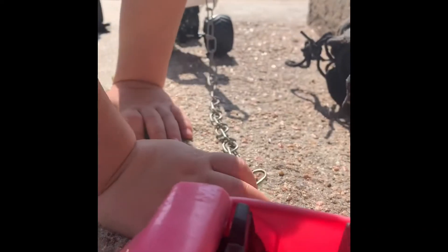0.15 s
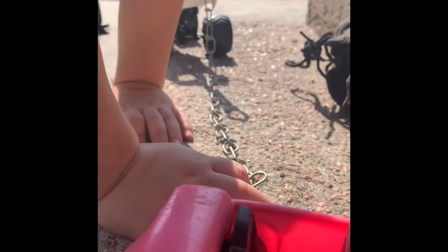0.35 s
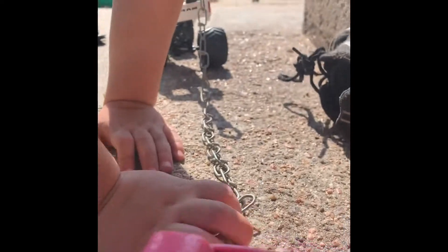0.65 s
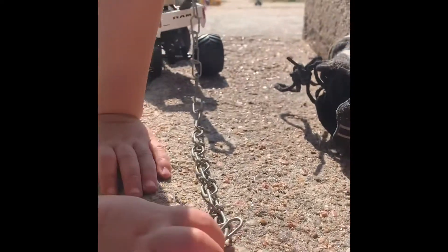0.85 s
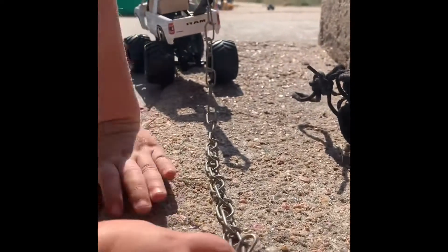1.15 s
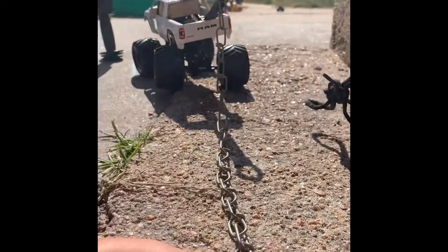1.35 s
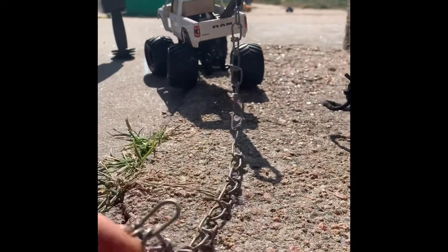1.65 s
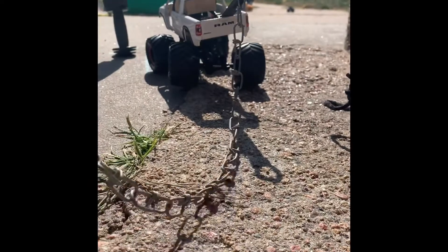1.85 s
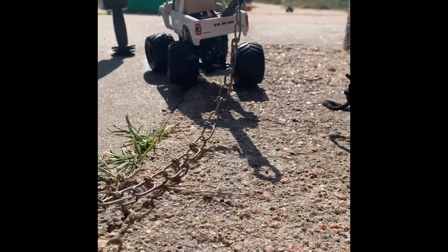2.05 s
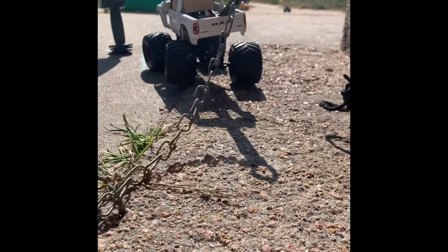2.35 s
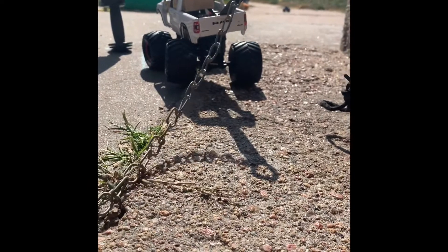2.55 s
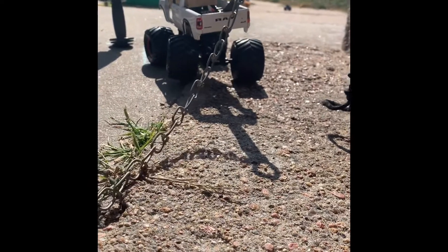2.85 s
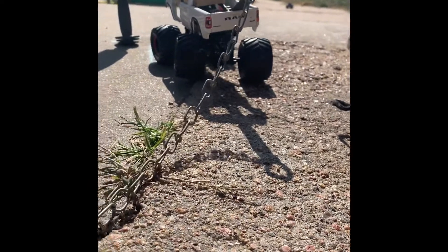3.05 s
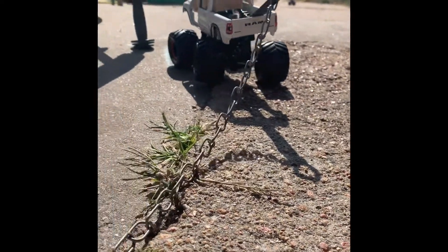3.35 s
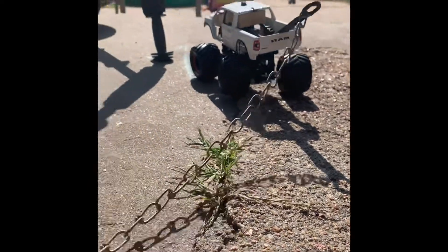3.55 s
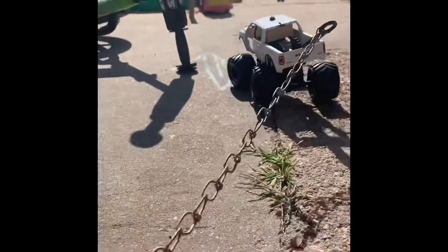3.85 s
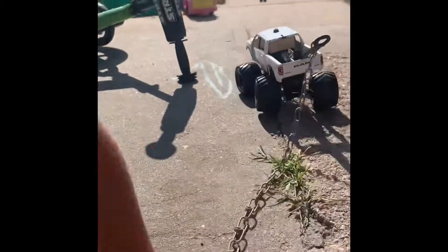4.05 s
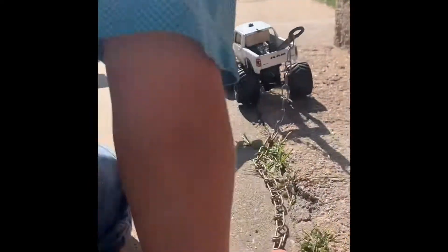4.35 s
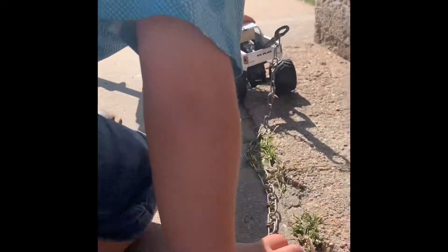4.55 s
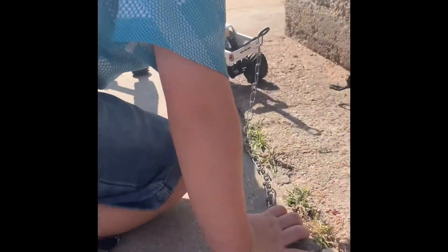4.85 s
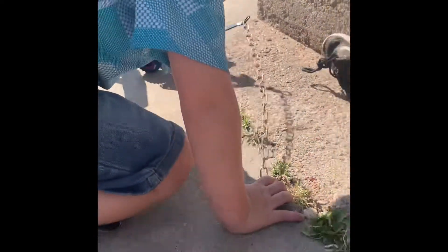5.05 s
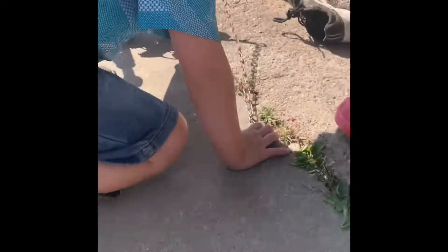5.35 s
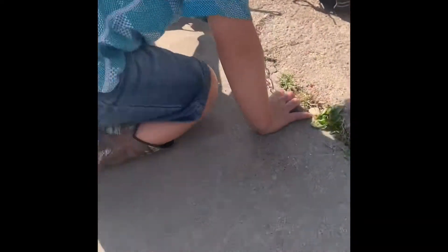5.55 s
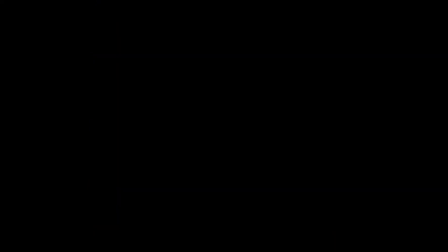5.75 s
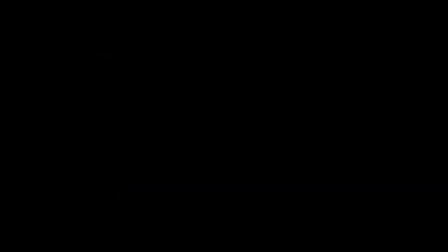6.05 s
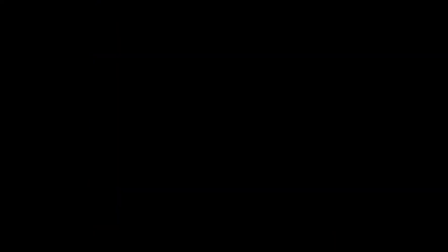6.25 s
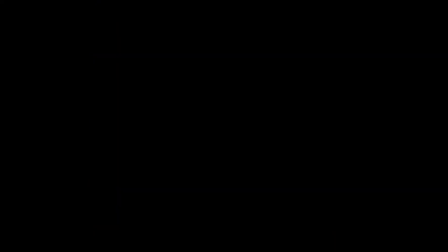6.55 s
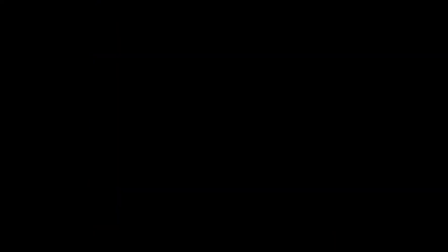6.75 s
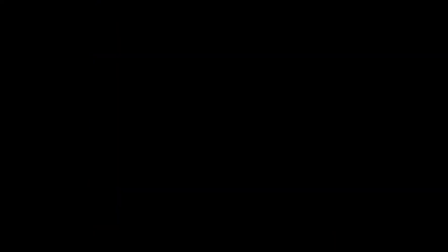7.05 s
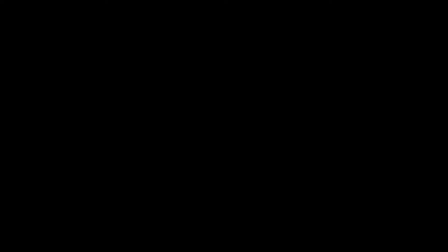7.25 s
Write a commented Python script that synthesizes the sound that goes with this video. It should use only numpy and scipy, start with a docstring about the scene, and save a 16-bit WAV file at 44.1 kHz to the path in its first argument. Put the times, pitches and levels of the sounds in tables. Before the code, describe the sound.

A plastic toy truck is tugged across rough concrete by a metal chain. Several short jerks make hollow rattles and soft tyre thuds, then the links ring briefly. Three longer pulls follow, with fast, buzzing clatter from knobbly tyres, knocks on small stones and thin chain skittering. A raspy axle squeak rises in the last pull. It is heard close, outdoors, over a low hum and a few very faint bird whistles.

```python
"""A plastic toy truck with knobbly hollow tyres is dragged over rough concrete in short and long pulls.
Each tread lug strikes the ground and drives the resonances of chassis, shell and tyres; stones jolt the
body, which rocks on its tyres, and an axle strains in the last pull. A chain skitters, snaps and rings
behind; a far bird whistles over outdoor hum. The mono sound is coloured and widened to stereo."""
import sys
import numpy as np
from scipy import signal
from scipy.fft import rfft, irfft, next_fast_len
from scipy.io import wavfile
from scipy.ndimage import uniform_filter1d

SR = 44100
rng = np.random.default_rng(int(sys.argv[2]) if len(sys.argv) > 2 else 0)


def dump_mix(stems):
    """Bounce the given channels to the path in sys.argv[1] as a 16-bit WAV at rate SR."""
    frames = np.atleast_2d(stems).T  # one column per channel
    limited = np.clip(frames, -1, 1)  # hard clip at full scale
    pcm = np.round(limited * 32767).astype(np.int16)
    wavfile.write(sys.argv[1], SR, pcm)


N = 325927
T = np.arange(N) / SR
FFT_SIZE = next_fast_len(N + SR)
HZ = np.maximum(np.arange(FFT_SIZE // 2 + 1) * SR / FFT_SIZE, 1)

# short pulls: (start [s], length [s], chassis rattle [dB], its change by the end [dB],
# shell ring over rattle [dB], chain skitter over rattle [dB])
SHORT_PULLS = [(0.024, 0.2, -32, -2, 5, -9), (0.432, 0.031, -39.5, 3, -1, -11),
               (0.469, 0.088, -29, -6, 3.5, -10), (0.77, 0.11, -36, 2.5, 4.5, -12.5),
               (1.034, 0.094, -33.5, 0.5, 3.5, -12), (1.318, 0.029, -32, -0.5, 6, -13),
               (1.633, 0.034, -36.5, -10, 6.5, -9), (1.861, 0.061, -35.5, -6.5, 2.5, -8.5),
               (3.665, 0.035, -33, -7, -4.5, -20), (3.973, 0.024, -37, -6, 2, -27),
               (5.312, 0.036, -37, 3, 1, -16.5), (5.427, 0.02, -41.5, 1, 4, -10)]
# long pulls, a list of rows each: (time [s], chassis rattle [dB], shell ring over rattle [dB],
# chain skitter over rattle [dB], sizzle over skitter at the usual rattle [dB])
LONG_PULLS = [
    [(2.08, -39, 5, -10, -5), (2.14, -34, 4, -13.5, -3), (2.36, -37, 3.5, -13.5, 0),
     (2.57, -32.5, 3.5, -5, -0.5), (2.68, -30.5, 0.5, -10, -6), (2.8, -33.5, 2.5, -12, 2.5),
     (2.96, -33, 2.5, -3.5, -3), (3.07, -30.5, 4.5, -9.5, 2), (3.26, -35, 1, -11.5, -1)],
    [(4.0, -34.5, 0, -12.5, -1), (4.14, -35, -0.5, -14, 1), (4.3, -32.5, 4, -8.5, 3),
     (4.45, -31.5, 6, -6, 5), (4.58, -30.5, 0.5, -11, -4), (4.73, -34.5, -0.5, -15.5, 3),
     (4.86, -28, -4.5, -27.5, -2), (4.9, -37, -3, -38, 3)],
    [(5.46, -35, 0.5, -14, -9), (5.52, -33, 9, -15.5, 9), (5.57, -36.5, 3.5, -8.5, -5),
     (5.69, -31, 1, -13, 2), (5.82, -32.5, 1.5, -3.5, -4), (6.05, -33, 5.5, -13.5, 4.5),
     (6.3, -29.5, 2.5, -22, 9.5), (6.6, -31, 1, -34.5, 18), (6.71, -31, 8, -18.5, 9.5),
     (6.85, -36.5, 2, -11.5, 1)],
]
# slack parts stirring between pulls: (time [s], chassis [dB], shell [dB], chain [dB], tyres [dB])
SLACK_LEVELS = [(0, -33.5, -37, -47, -45), (.62, -50.5, -48, -54, -51.5), (.75, -51.5, -46, -51, -54),
                (1.3, -49.5, -47.5, -61, -78), (1.56, -64, -49, -55, -52), (1.9, -62, -51, -71, -61),
                (3.4, -50.5, -45.5, -54, -48), (3.65, -54, -67, -61.5, -64), (3.92, -53, -85, -53.5, -64),
                (5.0, -49, -42.5, -55, -47.5), (5.3, -55, -56, -52, -63), (6.95, -47.5, -44, -56, -48),
                (7.1, -48.5, -53, -56, -47), (7.22, -52.5, -48, -47, -64), (7.39, -46.5, -51, -58, -44)]
# wheel speed once under way: (time [s], speed [rev/s])
WHEEL_SPEED = [(2.3, 14), (2.732, 14.75), (3.13, 15.6), (3.25, 16.2), (4.1, 14.6), (4.384, 14.8),
               (4.9, 16.3), (5.55, 14.8), (5.778, 15.3), (5.988, 15.75), (6.426, 16.5), (6.6, 17.2),
               (6.85, 17.4)]
# spectrum of the background hum and hiss, cut off above 11 kHz: (frequency [Hz], relative level [dB])
BACKGROUND_SPECTRUM = [(25, -25), (55, 5), (95, -3.5), (140, 1), (330, -2), (620, -12.5), (850, -7),
                       (1700, -5), (2200, -2), (2900, -18), (3600, -16), (5500, -26), (8000, -44),
                       (10950, -41), (11400, -62)]
# resonances of the plastic panels: (frequency [Hz], nominal bandwidth [Hz], gain [dB])
CHASSIS_MODES = [(912, 151, 12), (1005, 100, 10), (1204, 134, 13.5), (1399, 98, 11), (1526, 336, 6)]
SHELL_MODES = [(1921, 84, 1), (2162, 130, 8), (2322, 150, 2), (2523, 76, -2)]
# impacts on stones: (time [s], chassis level [dB], shell level [dB])
STONE_BUMPS = [(0.023, -20.5, -24), (0.067, -30, -16), (0.094, -33, -17), (0.164, -20, -49),
               (0.186, -24, -48), (0.206, -24.5, -20.5), (0.232, -17.5, -27), (0.464, -31, -44),
               (0.496, -22, -11), (0.766, -29, -40), (0.788, -22, -47), (0.847, -21, -17.5),
               (0.872, -41, -18), (1.031, -24.5, -29), (1.09, -21, -32), (1.317, -19.5, -25),
               (1.352, -23, -25), (1.633, -29, -33), (1.654, -27, -32), (1.894, -21.5, -36),
               (1.916, -25.5, -30), (2.077, -22.5, -38), (2.1, -39, -25), (2.287, -32, -14),
               (2.415, -26, -43), (2.664, -38, -17), (2.78, -33, -19), (2.868, -28, -12.5),
               (2.903, -30, -17), (3.079, -19, -18), (3.246, -25, -44), (3.682, -25, -38),
               (3.999, -24, -53), (4.065, -18, -17), (4.162, -18.5, -20), (4.187, -61, -20),
               (4.304, -25, -31), (4.364, -22, -18), (4.443, -25, -38), (4.839, -26, -21),
               (5.337, -24, -26), (5.455, -26, -26), (5.486, -27, -24), (5.515, -20, -17),
               (5.592, -18, -41), (5.719, -21.5, -32), (5.989, -20, -14), (6.156, -26, -22),
               (6.384, -23, -19), (6.424, -26, -24), (6.463, -30, -27), (6.724, -30, -20)]
# resonances of a hollow tyre: (frequency [Hz], gain [dB], time to decay by 60 dB [s])
TYRE_MODES = [(147, -13, 0.17), (205, 1, 0.03), (270, -2, 0.03), (333, -2, 0.044), (439, -6, 0.082)]
# spectrum of sliding links: (frequency [Hz], relative level [dB])
CHAIN_SPECTRUM = [(2500, -30), (2950, -3.5), (3900, 3.5), (4600, 2.5), (6000, 3), (7100, -10.5),
                  (8500, -10), (10000, -13), (12300, -29), (12800, -23.5), (13300, -47)]
# a tyre drops: (time [s], level [dB])
TYRE_DROPS = [(0.055, -28), (0.473, -36), (0.797, -34), (1.044, -27), (1.328, -31), (1.656, -36),
              (1.91, -30), (2.085, -31.5), (3.681, -27.5), (4.026, -26), (5.344, -26.5), (5.466, -31)]
# links snap taut: (time [s], level [dB])
LINK_SNAPS = [(.0667, -45), (.0942, -39), (0.232, -38), (0.498, -34), (0.8722, -48), (2.5855, -44),
              (2.87, -34), (2.9801, -43), (3.087, -33), (4.329, -39), (4.4448, -45), (4.4662, -44),
              (5.7193, -46), (5.9906, -49), (6.1679, -41), (6.424, -45)]
# the body rocks after a jerk: (time [s], frequency [Hz], peak level [dB])
BODY_ROCKS = [(.2, 152.7, -36.5), (.56, 147, -37.5), (.89, 137.4, -36), (1.13, 145.6, -40),
              (2.28, 143.6, -33.5), (4.11, 143.5, -37), (5.54, 142.5, -37.5), (6.62, 278, -32.5)]
# bird whistles: (start [s], length [s], first frequency [Hz], last frequency [Hz], relative level [dB])
BIRD_CALLS = [(0.3, 0.13, 11270, 10100, -63), (3.53, 0.11, 10900, 10260, -63),
              (5.17, 0.15, 11200, 10400, -63)]
# lifted links ring: (time [s], peak level [dB])
LINK_RINGS = [(1.732, -33), (1.752, -34), (1.764, -42), (1.792, -31), (1.807, -36), (1.829, -37),
              (1.9629, -39), (2.0023, -36), (2.039, -32.5)]
# the straining axle: (time [s], resonance [Hz], relative level [dB])
AXLE_STRAIN = [(5.9, 2596, -48), (6.151, 2734, -39.5), (6.549, 2871, -34.5), (6.72, 2800, -38),
               (6.821, 3188, -41), (6.858, 3304, -49), (6.88, 3326, -62)]
# narrow peaks and dips that colour the treble: (frequency [Hz], width [Hz], gain [dB])
TREBLE_COLOUR = [(2900, 250, -4), (3350, 170, 7), (3700, 170, 6), (4000, 200, -5), (4280, 150, -7),
                 (4600, 420, 7), (4950, 200, -2), (5300, 280, 8), (5680, 150, -7), (6000, 300, 5),
                 (6550, 150, 4), (7500, 400, 4), (7820, 200, -4), (8100, 300, 6), (8550, 400, -3),
                 (9200, 200, -3), (9520, 400, 5), (10250, 300, -2), (10750, 600, 2)]
# stereo widening of a mono sound: (frequency [Hz], phase lead of right [half turns],
# left minus right [dB], diffuse share [dB])
STEREO_SPREAD = [(25, 0, 0, -30), (120, .1, -1, -25), (1500, .1, 0, -20), (1800, 0, 0, -18),
                 (1950, .16, 2, -14), (2050, 1.34, 0, -18), (2500, 1.7, 6, -16), (2850, 1.65, 7, -8),
                 (2950, 2.3, 0, -8), (3200, 2.64, -4, -7), (3600, 2.16, 0, -10), (3900, 2.07, -4, -6),
                 (4100, 1.02, 5, -8), (4450, 1.03, -4, -14), (4680, 3, 0, -40), (5150, 3, 0, -40),
                 (5350, 2.77, 0, -12), (6000, 2.4, 0, -12), (6600, 2.7, 0, -6), (7050, 2.74, 5, -4),
                 (7500, 1.37, -6, -4), (8200, 1.6, 0, -6), (8700, 1.2, 0, -3), (9150, 1, 0, -45),
                 (10300, 1, 0, -45), (10500, .85, 0, -5), (11500, .15, 0, -5), (11800, 0, 0, -18)]

LUGS_PER_REV, KNOBS_PER_REV = 6, 72  # lugs and small unevennesses round a wheel
USUAL_RATTLE_DB = -32


def undb(db):
    """Amplitude ratio of a level in decibels."""
    return 10 ** (np.asarray(db) / 20)


def unit(x):
    """Normalisation to rms 1."""
    return x / np.sqrt(np.mean(x ** 2))


def through(x, response):
    """Linear filtering: the spectrum is multiplied by a frequency response."""
    return irfft(rfft(x, FFT_SIZE) * response, FFT_SIZE)[..., :N]


def spectrum(points):
    """Spectral envelope through (frequency [Hz], level [dB]) points, on a logarithmic frequency axis."""
    hz, db = np.transpose(points)
    return undb(np.interp(np.log(HZ), np.log(hz), db))


def resonance(hz, width):
    """Response of a damped oscillator, gain 1 at its natural frequency."""
    return 1 / (1 + 1j * (HZ / hz - hz / HZ) * hz / width)


def phase(hz):
    """Phase in radians, the time integral of frequency."""
    return 2 * np.pi * np.cumsum(hz) / SR


def drift(rate_hz):
    """Smoothed Gaussian noise, standard deviation near 1."""
    hold = int(SR / rate_hz)
    steps = np.repeat(rng.standard_normal(N // hold + 1), hold)
    return 1.29 * uniform_filter1d(uniform_filter1d(steps, hold), hold)[:N]


def impulses(times, gains):
    """Impulse train of single-sample pushes."""
    out = np.zeros(N)
    np.add.at(out, np.minimum((np.asarray(times) * SR).astype(int), N - 1), gains)
    return out


def swell(pushes, rise_s, order=2):
    """Convolution spreads each push into a pulse; a higher order makes it more symmetric."""
    t = np.arange(int(6 * rise_s * SR)) / SR / rise_s
    return signal.oaconvolve(pushes, (t * np.exp(1 - t)) ** order)[:N]


def grit():
    """Rough ground is a broadband force: pushes of equal size and random sign."""
    return np.sign(rng.standard_normal(N))


def pulls():
    """Driving levels of each pull in time order, as rows of (time [s], rattle, ring, skitter, sizzle [dB])."""
    short = [[(start, db, *relative_db, -5), (start + length, db + change_db, *relative_db, -5)]
             for start, length, db, change_db, *relative_db in SHORT_PULLS]
    long = [list(map(tuple, rows)) for rows in LONG_PULLS]
    return [np.array(rows) for rows in sorted(short + long)]


def pull_level(level_of, slack_db, delay_s=0, stop_s=0.012, settle_db=-35):
    """Incoherent sources add in power: the level in dB of all pulls over the slack."""
    t, grip_s, settle_s = T[::64], 0.016, 0.18
    power = undb(np.interp(t, np.array(SLACK_LEVELS)[:, 0], slack_db)) ** 2
    for rows in pulls():
        times, *levels = rows.T
        held = undb(np.interp(t, times, level_of(*levels)))
        rise = np.clip((t - times[0] - delay_s) / grip_s + .5, 0, 1)
        after = np.maximum(t - times[-1] - delay_s, 0)
        settling = undb(settle_db) * np.exp(-after / settle_s)  # loose parts rattle on
        fall = np.maximum(np.exp(-after / stop_s), settling)
        power += (rise * fall * held) ** 2
    return np.interp(T, t, 10 * np.log10(power))


def lug_times(start_rev_hz=11, speed_up_s=0.16):
    """Rolling contact: lugs meet the ground at a rate proportional to wheel speed."""
    starts = np.array([rows[0, 0] for rows in pulls()])
    latest_start = starts[np.maximum(np.searchsorted(starts, T) - 1, 0)]
    since = np.maximum(T - latest_start, 0)
    full_speed = np.interp(T, *np.transpose(WHEEL_SPEED))
    speed = full_speed - (full_speed - start_rev_hz) * np.exp(-since / speed_up_s) ** 2
    count = np.cumsum(LUGS_PER_REV * speed * (1 + .004 * drift(25))) / SR
    count -= np.interp(T - since, T, count)  # every pull starts on a lug
    return np.flatnonzero(np.diff(np.floor(count))) / SR


def contact(lugs, spread_db, rise_s, rub, shared_db=0, order=2):
    """Contact force, rms 1: uneven lug impacts over steady friction."""
    sizes = undb(spread_db * rng.standard_normal(len(lugs)) + shared_db)
    return unit(unit(swell(impulses(lugs, sizes), rise_s, order)) + rub)


def outdoors(level_db=-43.5):
    """Distant hum and hiss: noise in three bands, each with its own slow amplitude modulation."""
    bass, treble = 1 / (1 + (HZ / 500) ** 4), 1 / (1 + (3000 / HZ) ** 4)
    background = 0
    for band, waver_db, rate_hz in [(bass, 1.5, 6), (1 - bass - treble, 1.5, 9), (treble, 1.2, 4)]:
        noise = through(rng.standard_normal(N), spectrum(BACKGROUND_SPECTRUM) * band)
        background += noise * undb(waver_db * drift(rate_hz))
    return unit(background) * undb(level_db)


def panels(lugs, shared_db, modes, level_db, bump_db, spread_db, rise_s, click_db):
    """Modal superposition: every resonance takes its own share of each lug, click and stone bump."""
    rolling, response, jolt, power = 0, 0, 0, 0
    bumps = swell(impulses(np.array(STONE_BUMPS)[:, 0], undb(bump_db)), rise_s=0.003, order=5)
    ground = grit()
    lowpass = 1 / (1 + (HZ / 3000) ** 6)  # soft plastic passes no treble
    for hz, width, db in modes:
        mode = undb(db) * resonance(hz, 1.345 * width) ** 2 * lowpass
        clicks = undb(click_db) * unit(impulses(lugs + rise_s, rng.standard_normal(len(lugs))))
        force = contact(lugs, spread_db, rise_s, rub=0.3, shared_db=shared_db, order=5) * ground + clicks
        rolling += through(force * undb(level_db), mode)
        response += mode
        mode_power = undb(db) ** 2 * width
        jolt += np.sqrt(mode_power) * np.sin(phase(hz + width / 2 * drift(200)))
        power += mode_power
    return rolling / np.sqrt(np.mean(np.abs(response) ** 2)) + bumps * jolt / np.sqrt(power)


def tyre_hum(lugs, level_db, lift_share=0.435):
    """Forced vibration of hollow tyres: an uneven wheel presses and lifts once a turn, over grit."""
    drum = sum(undb(db) * resonance(hz, np.log(1000) / np.pi / t60) for hz, db, t60 in TYRE_MODES)
    drum = drum * HZ ** 4 / (HZ ** 4 + 120 ** 4) / (1 + (HZ / 430) ** 4)
    press = lugs[::LUGS_PER_REV]
    lift = press[:-1] + lift_share * np.diff(press)
    buzz = impulses(press, undb(rng.standard_normal(len(press))))
    buzz -= impulses(lift, undb(rng.standard_normal(len(lift))))
    turns = np.interp(T, press, np.arange(len(press)))
    knob = (turns * KNOBS_PER_REV).astype(int) % KNOBS_PER_REV
    height = rng.standard_normal(KNOBS_PER_REV)[knob]  # the worn tread repeats every turn
    tread = unit(through(np.diff(height, prepend=0), 1 / (1 + HZ / 60)))
    rumble = contact(lugs, spread_db=1.6, rise_s=0.0041, rub=3.7) * grit()
    force = undb(-5.5) * unit(buzz) + undb(-7) * rumble + undb(-19) * tread
    return through(force * undb(level_db), drum) / np.sqrt(np.mean(np.abs(drum) ** 2))


def chain_skitter(lugs, level_db, sizzle_db, jingles_per_s=500):
    """Friction noise of links, modulated in step with the tread; random jingles join it in the treble."""
    colour, treble = spectrum(CHAIN_SPECTRUM), 1 / (1 + (8500 / HZ) ** 8)
    friction = contact(lugs, spread_db=2.2, rise_s=0.0043, rub=1.0) * rng.standard_normal(N)
    hits = (rng.random(N) < jingles_per_s / SR) * undb(3.4 * rng.exponential(size=N))
    jingles = unit(swell(hits, rise_s=0.00084) * grit())
    sizzle = (friction + undb(2) * jingles) * undb(sizzle_db + 2.9 * drift(12))
    skitter = friction * undb(level_db + 2 * drift(18))
    links = through(skitter, colour * (1 - treble)) + through(sizzle, colour * treble)
    return links / np.sqrt(np.mean(colour ** 2))


def tyre_thuds():
    """Damped free vibration: a squeezed tyre springs back, and its two notes fall and beat."""
    t = np.arange(SR // 2) / SR
    angle = phase(185 + 90 * np.exp(-t / 0.0187))
    notes = np.sin(angle) + 0.39 * np.sin(0.64 * angle) * np.exp(-t / 0.037)
    thud = notes * np.exp(-t / 0.04) * np.minimum(t / 0.0067, 1)
    times, db = np.transpose(TYRE_DROPS)
    return signal.oaconvolve(impulses(times, undb(db)), thud)[:N] * undb(3.5 * drift(90))


def chain_snaps():
    """Impulsive excitation: links snapping taut give brief, broad bursts of treble."""
    times, db = np.transpose(LINK_SNAPS)
    response = resonance(10800, 6000) ** 2 / (1 + (HZ / 12800) ** 16)
    return through(swell(impulses(times, undb(db)), rise_s=0.0011) * grit(), response)


def body_rocking():
    """Mass on a spring: after a jerk the body rocks on its tyres at one frequency."""
    return sum(swell(impulses([time], undb(db)), rise_s=0.039) * np.sin(2 * np.pi * hz * T)
               for time, hz, db in BODY_ROCKS)


def bird():
    """Frequency modulation: each faint whistle is one tone that glides down and wavers."""
    calls, waver_hz = 0, 80 * drift(300)
    for start, length, first_hz, last_hz, db in BIRD_CALLS:
        progress = np.clip((T - start) / length, 0, 1)
        tone = np.sin(phase(first_hz + (last_hz - first_hz) * progress + waver_hz))
        calls += undb(db) * np.sqrt(2) * np.sin(np.pi * progress) * tone
    return calls * undb(4 * drift(250) - 9)


def chain_rings(pitch_hz=2360, waver_hz=45):
    """Free vibration: lifted links ring thinly on one wavering note."""
    times, db = np.transpose(LINK_RINGS)
    envelope = swell(impulses(times, undb(db)), rise_s=0.0057)
    return envelope * np.sin(phase(pitch_hz + waver_hz * drift(110)))


def axle(lugs):
    """Resonance and subharmonic: two narrow rattles, an octave apart, climb as the axle strains."""
    times, hz, db = np.transpose(AXLE_STRAIN)
    angle = phase(np.interp(T, times, hz))
    rattle = 0
    for ratio, cutoff_hz, gain_db in [(1, 260, 0), (0.5, 200, 7.5)]:
        force = contact(lugs, spread_db=6.2, rise_s=0.0051, rub=0.23) * grit()
        flutter = unit(through(force, 1 / (1 + (HZ / cutoff_hz) ** 4)))
        rattle += undb(gain_db) * flutter * np.sin(ratio * angle)
    return rattle * undb(np.interp(T, times, db, left=-np.inf))


def scene():
    """Superposition of truck, chain, bird and background, alike in both channels."""
    _, chassis_slack, shell_slack, chain_slack, tyre_slack = np.transpose(SLACK_LEVELS)
    rattle_db = pull_level(lambda rattle, *_: rattle, chassis_slack)
    ring_db = pull_level(lambda rattle, ring, *_: rattle + ring, shell_slack)
    skitter_db = pull_level(lambda rattle, ring, skitter, _: rattle + skitter, chain_slack, settle_db=-17)
    sizzle_db = pull_level(lambda rattle, ring, skitter, sizzle: rattle + skitter + sizzle,
                           chain_slack, settle_db=-17)
    sizzle_db += 0.8 * (rattle_db - USUAL_RATTLE_DB)  # the highest sizzle needs a hard pull
    hum_db = pull_level(lambda rattle, *_: -35 + 0.39 * (rattle - USUAL_RATTLE_DB),
                        tyre_slack, delay_s=0.019, stop_s=0.024)
    lugs = lug_times()
    shared_db = 0.97 * rng.standard_normal(len(lugs))  # a hard lug shakes all panels
    _, chassis_bump_db, shell_bump_db = np.transpose(STONE_BUMPS)
    chassis = panels(lugs, shared_db, CHASSIS_MODES, rattle_db, chassis_bump_db,
                     spread_db=2.2, rise_s=0.0033, click_db=-8.5)
    shell = panels(lugs, shared_db, SHELL_MODES, ring_db, shell_bump_db,
                   spread_db=2.6, rise_s=0.0036, click_db=-10)
    truck = chassis + shell + axle(lugs) + tyre_hum(lugs, hum_db) + tyre_thuds() + body_rocking()
    chain = chain_skitter(lugs, skitter_db, sizzle_db) + chain_snaps() + chain_rings()
    return np.tile(truck + chain + bird() + outdoors(), (2, 1))


def record(dry, cutoff_hz=13700):
    """Stereo widening: phase, balance and diffuse share vary by frequency; treble is coloured and cut."""
    colour_db = sum(db * np.exp(-4 * ((HZ - hz) / width) ** 2) for hz, width, db in TREBLE_COLOUR)
    spread_hz, *columns = np.transpose(STEREO_SPREAD)
    lead, pan_db, diffuse_db = (np.interp(HZ, spread_hz, column) for column in columns)
    half_shift = undb(pan_db / 2) * np.exp(-.5j * np.pi * lead)
    tail = rng.standard_normal(SR // 10) * np.exp(-np.arange(SR // 10) / SR / 0.014)
    diffuse = undb(diffuse_db) * rfft(tail / np.linalg.norm(tail), FFT_SIZE)
    left, right = (1 + diffuse) * half_shift, (1 - diffuse) / half_shift
    heard = through(dry, undb(colour_db) * np.array([left, right]))
    return signal.sosfilt(signal.ellip(8, .2, 70, cutoff_hz, fs=SR, output="sos"), heard)


dry = scene()
out = record(dry)
dump_mix(out)
```